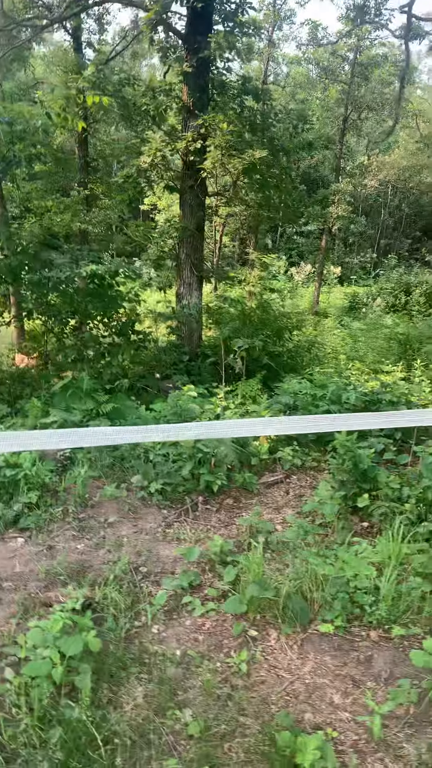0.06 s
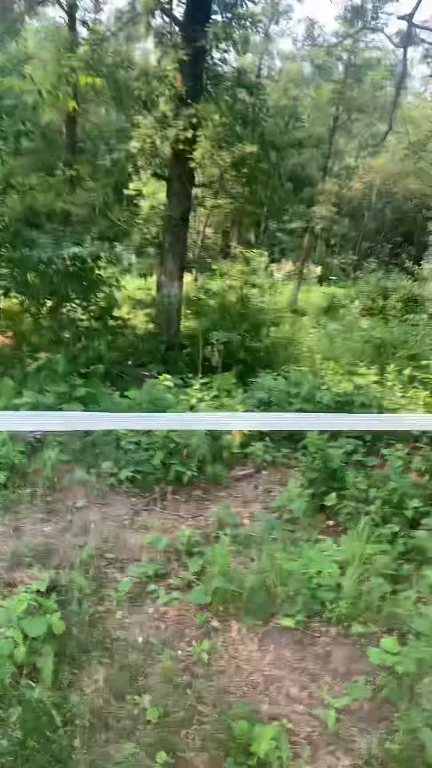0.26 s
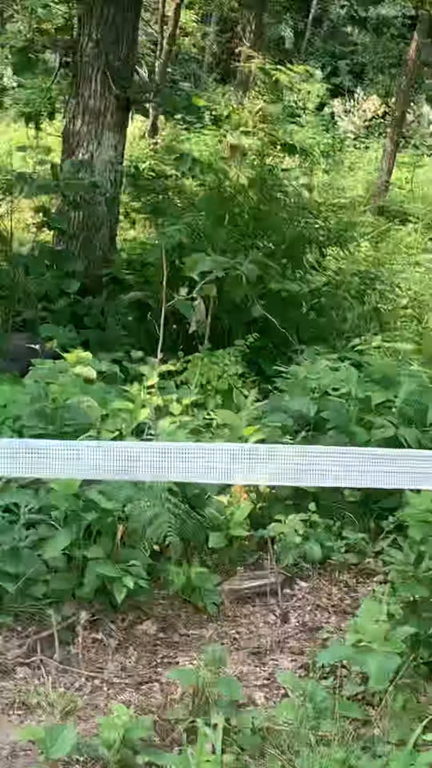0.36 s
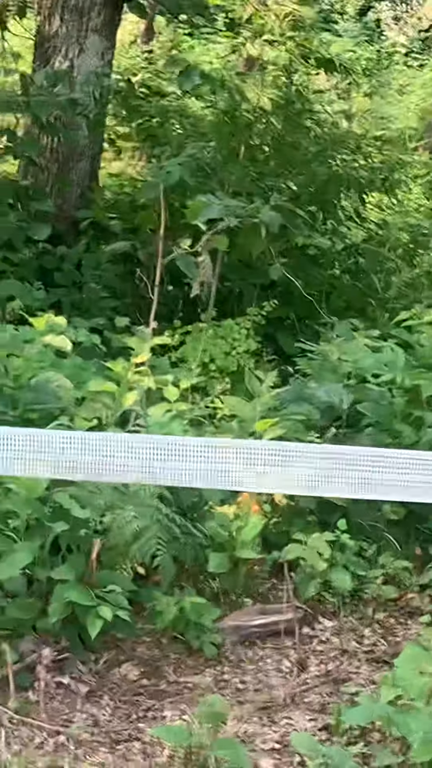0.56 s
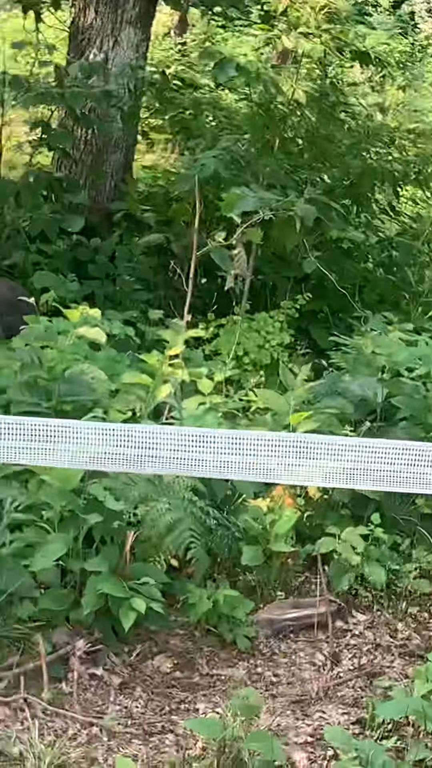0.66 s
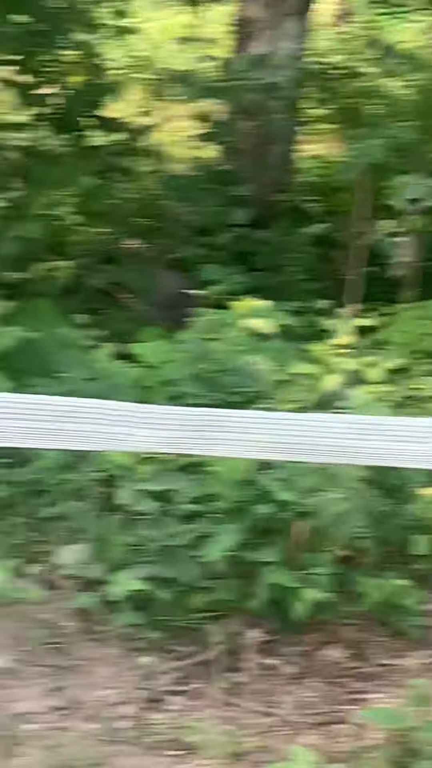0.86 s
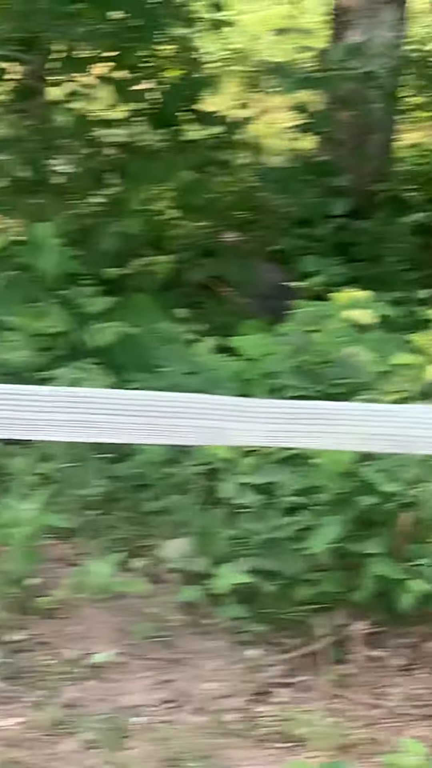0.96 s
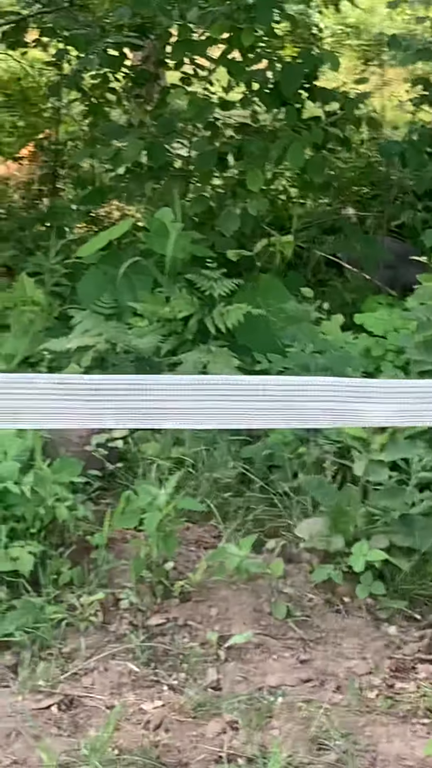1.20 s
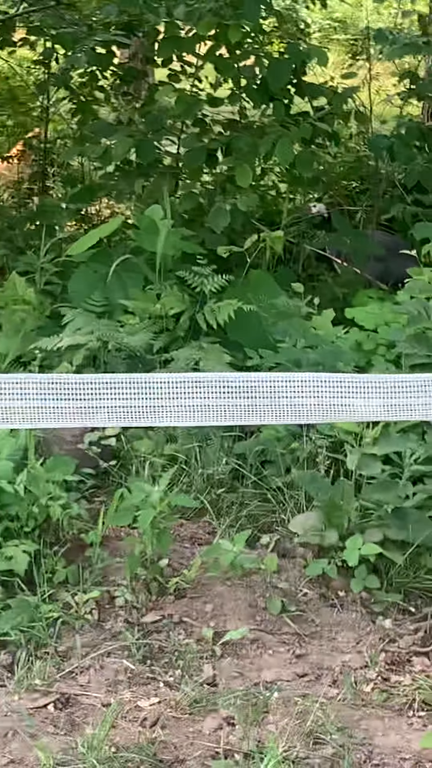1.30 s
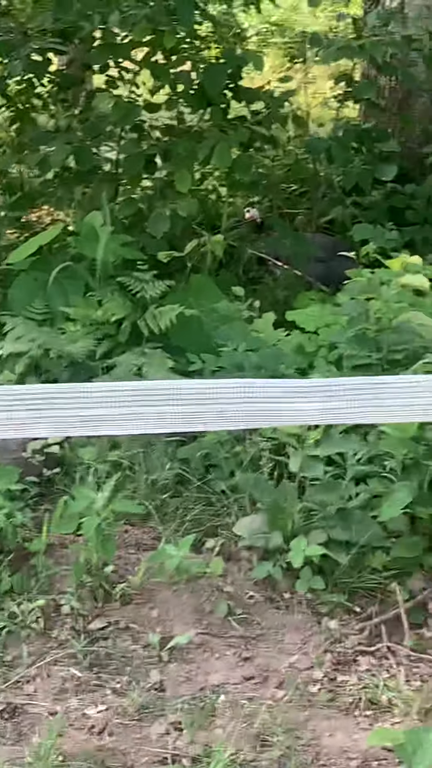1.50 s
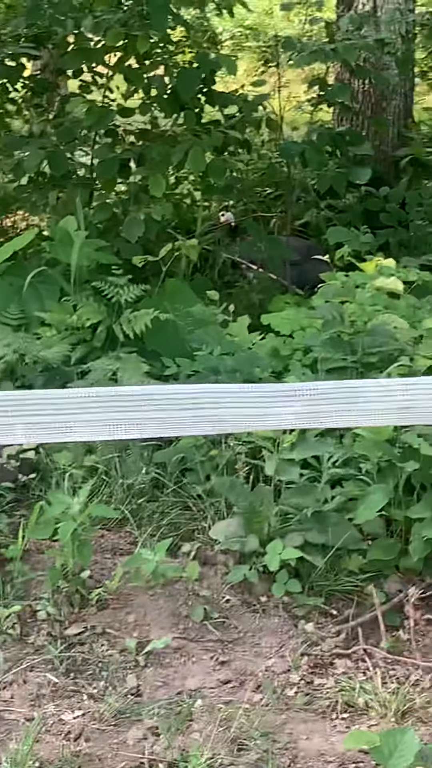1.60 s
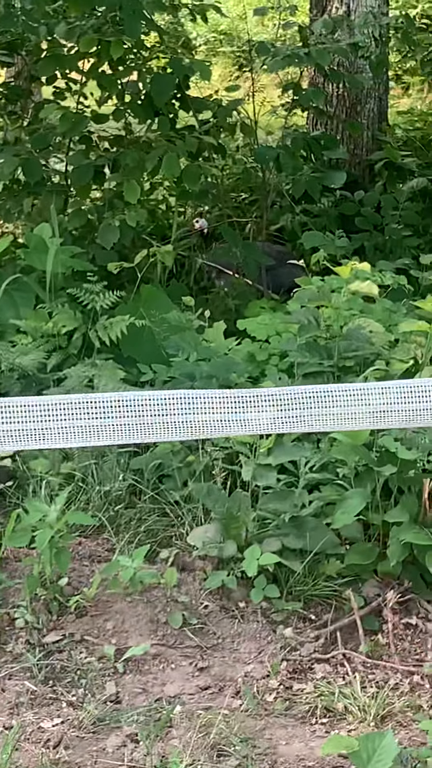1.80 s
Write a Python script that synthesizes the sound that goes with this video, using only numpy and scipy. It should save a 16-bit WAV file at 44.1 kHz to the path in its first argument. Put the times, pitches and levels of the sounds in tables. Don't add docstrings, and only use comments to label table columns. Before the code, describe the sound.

Guinea fowl rasp harshly by a wood. Low handling thumps around 0.03 and 0.2-0.35 s surround a faint rasp at 0.14; a strong rising rasp comes at 0.41-0.48. A close hen whines in two breaths, climbing from 0.48 to 0.97, with short clucks. A low rasp at 1.03 and more clucks precede the loudest rasp at 1.27-1.37, which echoes off trees over faint flock murmur and dipping background noise.

```python
import sys
import numpy as np
from scipy import signal
from scipy.fft import rfft, irfft, next_fast_len
from scipy.io import wavfile

SR = 44100
rng = np.random.default_rng(int(sys.argv[2]) if len(sys.argv) > 2 else 0)


def attenuation_scalar(level_db):
    decades = np.asarray(level_db, float) / 20
    return 10 ** decades


def waveform_to_disk(signal):
    frames = np.transpose(np.atleast_2d(signal))
    scaled = np.clip(frames, -1, 1) * 32767
    samples = np.round(scaled).astype(np.int16)
    wavfile.write(sys.argv[1], SR, samples)


N = 81585
T = np.arange(N) / SR


def rms_one(x):
    return x / np.sqrt(np.mean(x ** 2) + 1e-20)


def at_hz(points, hz):
    p = np.array(points)
    return np.interp(np.log(hz + 1), np.log(p[:, 0]), p[:, 1])


def drift(rate, size):
    r = np.exp(-2 * np.pi * rate / SR)
    warm_up = 9000
    white = rng.standard_normal(size + warm_up)
    return rms_one(signal.lfilter([1], [1, -2 * r, r * r], white)[warm_up:])


def reso(x, hz, width):
    r = np.exp(-np.pi * width / SR)
    poles = [1, -2 * r * np.cos(2 * np.pi * hz / SR), r * r]
    return signal.lfilter([(1 - r * r) / 2, 0, (r * r - 1) / 2], poles, x)


def coloured(points):
    hz = np.fft.rfftfreq(N, 1 / SR)
    spectrum = rfft(rng.standard_normal(N)) * attenuation_scalar(at_hz(points, hz)) * (hz > 25)
    return rms_one(irfft(spectrum, N))


def level(s, db):
    inside = np.minimum(T - s[0], s[-1] - T)
    return attenuation_scalar(np.interp(T, s, db)) * np.clip(inside / 0.0026 + 1, 0, 1)


def syrinx(hz, jitter, rough):
    cycles = np.cumsum(hz * (1 + jitter * drift(150, N))) / SR
    pulses = (np.diff(np.floor(cycles), prepend=0) > 0) * attenuation_scalar(2 * drift(91, N))
    noise = rng.standard_normal(N) * np.exp(-1.3 * (cycles % 1))
    rough = np.clip(rough, 0, 1)
    return np.sqrt(1 - rough) * rms_one(pulses) + np.sqrt(rough) * rms_one(noise), cycles


def quiet_floor():
    # (frequency [Hz], level [dB per Hz])
    floor_colour = [(30, -21), (60, -4), (125, -4), (300, -9.5), (700, -11.5), (2300, -31.5), (5000, -31),
                    (8000, -45.5)]
    # (time [s], gain [dB])
    ducking = [
        (0, 5),
        (1.38, -0.6),
        (1.45, -5.5),
        (1.62, -8),
        (1.7, 5),
        (1.85, -3.5),
    ]
    noise = attenuation_scalar(-62.5 + 0.5 * drift(9, N)) * coloured(floor_colour) * level(*np.transpose(ducking))
    hum_hz = 126
    return noise + attenuation_scalar(-67.5 + 2 * drift(9.6, N)) * np.sin(2 * np.pi * hum_hz * T)


def wind():
    # (time [s], level [dB])
    gusts = [(0.0, -70), (0.112, -66.5), (0.282, -58), (0.34, -54), (0.546, -75), (0.694, -83),
             (1.204, -72), (1.37, -71.5), (1.592, -78), (1.85, -75)]
    hz, width = 55, 33
    lumpy = reso(reso(rng.standard_normal(N), hz, width), hz, 2 * width)
    return level(*np.transpose(gusts)) * rms_one(lumpy)


def leftover():
    # (frequency [Hz], width [Hz], level [dB], t60 [s])
    old_echo = (5800, 898.5, -68, 0.03)
    hz, width, db, t60 = old_echo
    band = reso(reso(rng.standard_normal(N), hz, width), hz, width)
    return attenuation_scalar(db - 60 * T / t60) * rms_one(band)


def far_flock():
    # (time [s], level [dB])
    murmur = [(0, -99), (.12, -59), (0.451, -59), (1.598, -69.5), (1.75, -61), (1.85, -66.5)]
    # (frequency [Hz], width [Hz], level [dB])
    flock_throat = [(517.6, 40, -5), (1565, 130, -3), (1680, 520, -4.5), (3400, 700, -8)]
    voices = np.zeros(N)
    for hz, width, db in flock_throat:
        band = reso(reso(rng.standard_normal(N), hz, width), hz, 2 * width)
        voices += attenuation_scalar(db + 3.3 * drift(28, N)) * rms_one(band)
    return level(*np.transpose(murmur)) * voices


def knocks():
    touch_s = [.0295, .1969, .2032, .2034, .2015, .202, .2025, .2098, .2961, .2991, .2995, .2995, .3182,
               .3136, .3203, .319, .3466, .375, .485, .705, .72, .9512, .9617, .9922, .972, .99, 1.30, 1.76]
    # (level [dB], ring [Hz], t60 [s])
    touch_ring = [(-36, 745, 0.0093), (-10, 137, .044), (3, 70.8, .028), (-6.5, 530, .019),
                  (-16, 642, .014), (-32, 1070, 0.016), (-30.5, 2060, 0.0066), (-36, 6500, 0.002),
                  (-34.5, 305, 0.029), (-15.5, 100, 0.0088), (-46.5, 1090, 0.029), (-36.5, 520, 0.017),
                  (-24, 280, .018), (-24, 140, .034), (-33, 490, .026), (-41, 1080, 0.014),
                  (-34, 330, 0.016), (-42, 170, .04), (-40.5, 43, 0.08), (-38, 28, 0.081),
                  (-40.5, 73, 0.052), (-15, 44.5, .077), (-11.5, 40.2, .042), (-29, 159, .02),
                  (-29.5, 72.5, .115), (-22, 63.5, .062), (-47, 57, 0.064), (-51, 41, 0.11)]
    out = np.zeros(N)
    for s, (db, hz, t60) in zip(touch_s, touch_ring):
        t = np.maximum(T - s, 0)
        onset = 1 - np.exp(-t * hz * 1.5)
        out += attenuation_scalar(db + 6 - 60 * t / t60) * np.sin(2 * np.pi * hz * t) * onset
    return out


def clucks():
    # (time of peak [s], length [s], level [dB], pulse rate [Hz], mouth resonance [Hz])
    cluck_rows = [(0.147, 0.043, -46.5, 266.5, 950), (.387, 0.06, -50, 270, 820),
                  (0.554, 0.022, -39.5, 236.6, 1150), (0.666, 0.058, -40.5, 240.8, 1057),
                  (0.741, 0.021, -35.5, 250, 1096), (0.958, 0.012, -38, 293, 1490),
                  (1.072, 0.024, -42.5, 1175, 1180), (1.096, 0.041, -48.5, 1150, 1150),
                  (1.13, 0.034, -45.5, 1197, 1190), (1.151, 0.036, -48.5, 200, 950),
                  (1.171, 0.034, -38, 920, 920), (1.166, .022, -41, 1140, 1140),
                  (1.184, 0.011, -37, 1050, 1050), (0.43, 0.046, -46, 250, 510),
                  (1.714, 0.028, -48.5, 1060, 1060), (0.157, 0.034, -52, 250, 740),
                  (0.152, 0.033, -53, 260, 260), (1.159, .03, -53, 278.1, 280)]
    out = np.zeros(N)
    for s, length, db, hz, mouth_hz in cluck_rows:
        source = syrinx(hz, jitter=0.03817, rough=.07)[0]
        lower = reso(source, mouth_hz, 130)
        upper = attenuation_scalar(-12) * reso(source, 1.55 * mouth_hz, 530)
        voiced = reso(lower - upper, mouth_hz, 1100)
        swell = np.cos(np.pi * np.clip((T - s) / length, -.5, .5)) ** 2
        out += attenuation_scalar(db + 1.5) * rms_one(voiced) * swell
    return out


def whine():
    # (time [s], pitch [Hz], level [dB], third partial [dB], half-pitch lines [dB])
    breaths = [
        [(.478, 422, -54.5, -57, -16), (.505, 428.9, -42, -45, -18), (.6, 452, -41, -44.5, -15),
         (.654, 480.6, -40, -82, -3), (.69, 458.6, -40.5, -65.5, -15.5), (.736, 496, -38, -51.5, -14.5),
         (.765, 465.6, -40, -51, -13.5), (.79, 472.5, -40.5, -61, -17)],
        [(.795, 469.4, -42.5, -57, -17), (.812, 490, -40, -46.5, -31), (.86, 533.5, -40.5, -44, -2.5),
         (.93, 572.7, -34, -43, -19), (.949, 609, -29, -35.5, -19), (.96, 586, -28.5, -34, -21),
         (.967, 564, -32.5, -41, -9.5)],
    ]
    # (frequency [Hz], gain [dB])
    hen_throat = [(480, -26), (580, -21.5), (720, -35), (830, 1.5), (1200, -0.5), (1850, -18.5),
                  (2300, -5.5), (2900, -43.5), (3500, -49.5)]
    # (frequency [Hz], level [dB per Hz])
    hen_hiss = [(700, -9.5), (1200, 3), (2300, 1), (3200, -13.5), (4500, -5.5), (6800, -3.5), (8200, -27),
                (15000, -21.5)]
    out, hiss = np.zeros(N), coloured(hen_hiss)
    for rows in breaths:
        s, hz, db, third_db, half_db = np.transpose(rows)
        pitch = np.interp(T, s, hz) * (1 + .004 * drift(55, N))
        cycles = np.cumsum(pitch) / SR
        for k in np.arange(1, 14, .5):
            if k == 3:
                gain = level(s, third_db)
            else:
                line_db = db + (half_db if k % 1 else 0)
                gain = level(s, line_db) * attenuation_scalar(at_hz(hen_throat, k * pitch))
            shimmer = attenuation_scalar(2.2 * drift(57, N))
            out += np.sqrt(2) * gain * shimmer * np.sin(2 * np.pi * (k * cycles + rng.random()))
        breath = attenuation_scalar(-12.5) * level(s, db) * attenuation_scalar(2.5 * drift(14, N)) * hiss
        out += breath * (1 + 0.2 * np.cos(2 * np.pi * cycles))
    return out


def rasps():
    # (time [s], level [dB], pitch [Hz])
    calls = [
        [(.128, -58, 342.7), (.141, -36.5, 343.9), (.151, -42, 346.3), (.157, -51, 338), (.195, -60, 349)],
        [(.410, -42, 340), (.420, -28.5, 350.6), (.430, -22, 361.5), (.468, -22, 380.2), (.478, -46.5, 387)],
        [(1.028, -42, 311.1), (1.036, -35, 319), (1.062, -34.5, 325), (1.074, -49, 295)],
        [(1.272, -36, 305.8), (1.284, -23.5, 324.8), (1.294, -19.5, 352.7), (1.32, -18.5, 371),
         (1.350, -23, 385.7), (1.358, -45, 365), (1.368, -51, 345)],
    ]
    # (roughness [0-1], low throat [dB], opening beak [dB], air [dB], fundamental [dB])
    voices = [(0.5, -17, 3, -29, -18.5), (0.53, 0, 2.5, -1.5, -26.5), (0.12, 6, 3, -8.5, -12),
              (0.45, 3, -12.5, 4.5, -24)]
    # (level [dB], pitch factor [1], width factor [1])
    necks = [(12, 0.95, 0.76), (7, 0.99, 1.19), (6.5, 0.9, 1.6), (5.5, 1.025, 1.5)]
    # (share of its growth [1], time the beak shuts [s], swell [dB])
    closings = [(0.9, .15, -3), (0.59, .463, 3.5), (0.05, 1.045, 2), (0.69, 1.345, 6)]
    # (frequency [Hz], width [Hz], level [dB], gain from start to end [dB])
    low_throat = [(950, 273, -8.5, 6), (1150, 318, -6.5, 9), (1546, 235, 2, 19.5), (1853, 130, -0.5, 2),
                  (2352, 486, -1.5, -7.5)]
    high_throat = [(3773, 260, 3, -2), (4453, 233, -0.5, -9.5), (5186, 433, -3, 15.5)]
    beak = [(2857, 334, 0.0024, -10.5)]
    air = [(5920, 1030, -2.5, 1), (9050, 6000, -14.5, 10), (11430, 4200, -13.5, 4.5),
           (15000, 1100, -13, 0.8)]
    out = np.zeros(N)
    for rows, voice, neck_set, closing in zip(calls, voices, necks, closings):
        rough, low_db, beak_db, air_db, root_db = voice
        high_db, shift, spread = neck_set
        share, shut_s, swell_db = closing
        low = [(f, width, res_db, share * grow_db) for f, width, res_db, grow_db in low_throat]
        neck = [(f * shift, width * spread, res_db, grow_db) for f, width, res_db, grow_db in high_throat]
        swell = swell_db * np.exp(-((T - shut_s) / .009) ** 2)
        s, db, hz = np.transpose(rows)
        source, cycles = syrinx(np.interp(T, s, hz), .025, rough)
        source = source * level(s, db)
        along = np.clip((T - s[0]) / (s[-1] - s[0]), 0, 1) - .5
        effort_db = 2.0 * (np.interp(T, s, db) - db.max())
        parts = ((low, low_db + swell + 0.13 * effort_db), (beak, beak_db),
                 (neck, high_db + 0.2 * effort_db), (air, air_db + effort_db))
        for throat, part_db in parts:
            for k, (f, width, res_db, grow_db) in enumerate(throat):
                driven = source * attenuation_scalar(part_db + res_db + 3 + grow_db * along)
                out += (-1) ** k * reso(reso(driven, f, width), f, 3 * width)
        out += attenuation_scalar(root_db - 0.31 * effort_db) * level(s, db) * np.sin(2 * np.pi * cycles)
    return out


def wood(x):
    # (frequency [Hz], t60 [s])
    wood_t60 = [(300, 0.21), (800, 0.61), (1500, .45), (2100, 0.82), (3100, 0.85), (5000, 0.59),
                (14000, 0.33)]
    t = T[:SR // 2 + SR // 4]
    edges = 200 * 2 ** np.arange(0, 6.6, .5)
    tail = 0
    for low, high in zip(edges, edges[1:]):
        band_pass = signal.butter(2, [low, high], "band", fs=SR, output="sos")
        band = signal.sosfilt(band_pass, rng.standard_normal(len(t)))
        decay = attenuation_scalar(-60 * t / at_hz(wood_t60, np.sqrt(low * high)))
        tail = tail + band * decay * np.clip(t / 0.019, 0, 1)
    early = rng.standard_normal(len(t)) * attenuation_scalar(-60 * t / 0.23) * np.clip(t / 0.0013, 0, 1)
    early = early - 0.58 * reso(early, 1520, 1520)
    echo = attenuation_scalar(-17.5) * tail / np.linalg.norm(tail) + attenuation_scalar(-7) * early / np.linalg.norm(early)
    echo = signal.sosfilt(signal.butter(2, 600, "high", fs=SR, output="sos"), echo)
    return signal.fftconvolve(x, echo)[:N]


def scene():
    fowl, hen = rasps() + clucks(), whine()
    background = quiet_floor() + far_flock() + wind() + leftover()
    mid = fowl + hen + wood(fowl + attenuation_scalar(-1) * hen) + background + knocks()
    unlike = wood(fowl + hen)
    side = attenuation_scalar(-27) * unlike + attenuation_scalar(-12) * reso(unlike, 2000, 2000)
    return mid + side * np.array([[1], [-1]])


def roll_off(x):
    return signal.sosfilt(signal.butter(12, 15660, fs=SR, output="sos"), x)


def record(dry):
    # (frequency [Hz], phase [rad])
    left_lead = [(0, 0), (60, -.45), (300, -1.15), (600, -1.05), (1100, -.6), (1500, -.45), (1850, .75),
                 (2300, 1.1), (3500, 1.35), (4200, 2.1), (4600, 3.0), (5000, 3.3), (5300, 4.3), (6370, 5.9),
                 (7490, 6.5), (8350, 9.3), (9450, 9.55), (10400, 12.6), (11600, 12.7), (12500, 15.6),
                 (13700, 15.8), (14400, 18.8), (17000, 19)]
    bass_lag_cycles, bass_left_db = 1.9, 1.6
    rumble_cut_hz, cutoff_hz = 42, 15640
    size = next_fast_len(N + 8192)
    hz = np.fft.rfftfreq(size, 1 / SR)
    sides = np.array([[1], [-1]])
    lead = np.interp(hz, *np.transpose(left_lead)) / 2
    smear = np.exp(-2j * np.pi * bass_lag_cycles * np.log(1 + hz / 30))
    balance = attenuation_scalar(sides * bass_left_db / 2 / (1 + (hz / 300) ** 2))
    rumble_cut = 1 / np.sqrt(1 + (rumble_cut_hz / (hz + 1)) ** 10)
    gain = balance * np.exp(1j * sides * lead) * smear * (hz < cutoff_hz) * rumble_cut
    mix = irfft(rfft(dry, size) * gain, size)[:, :N]
    return roll_off(mix)


dry = scene()
out = record(dry)
waveform_to_disk(out)
```